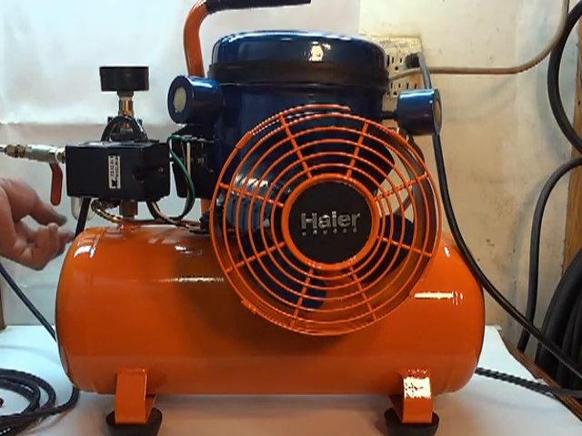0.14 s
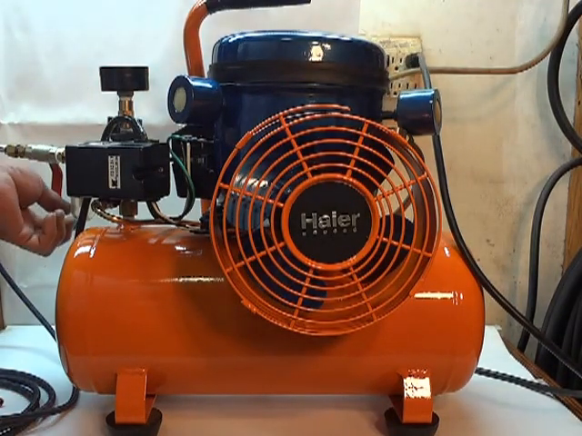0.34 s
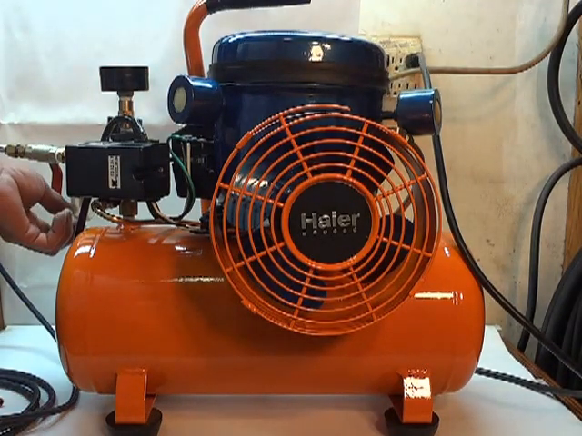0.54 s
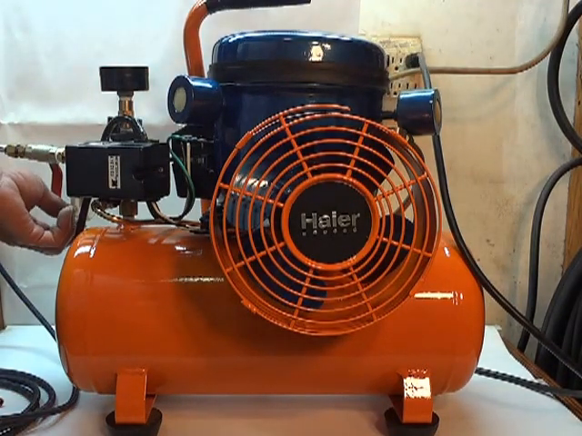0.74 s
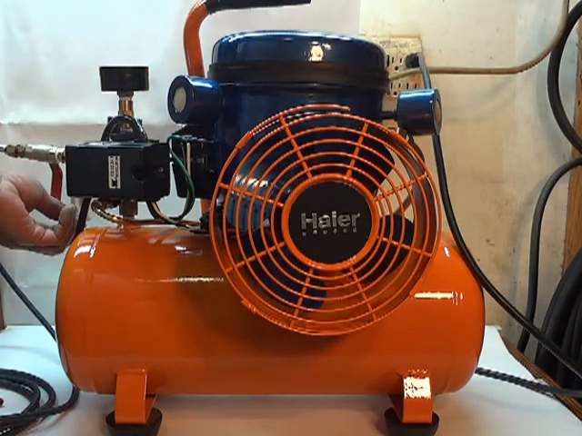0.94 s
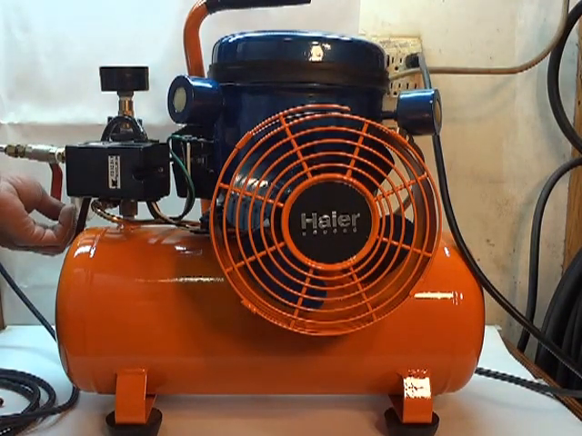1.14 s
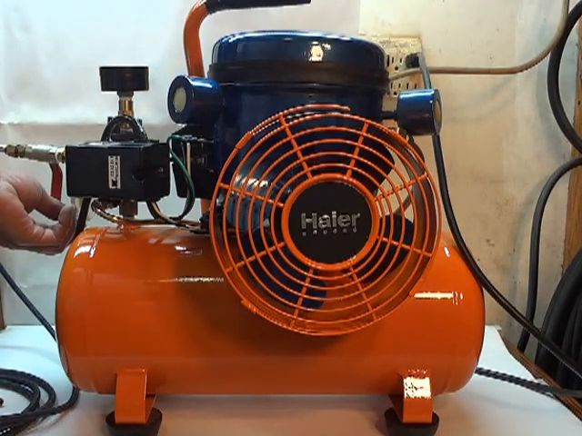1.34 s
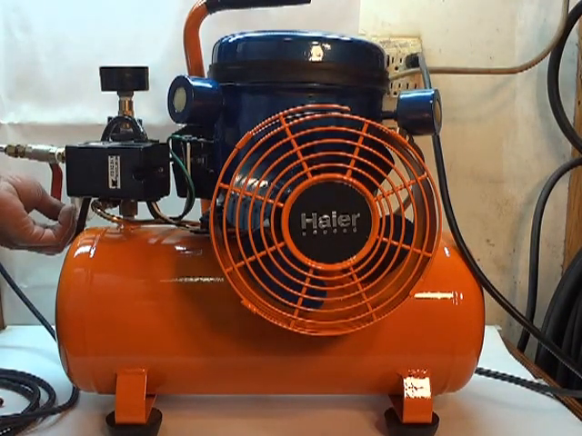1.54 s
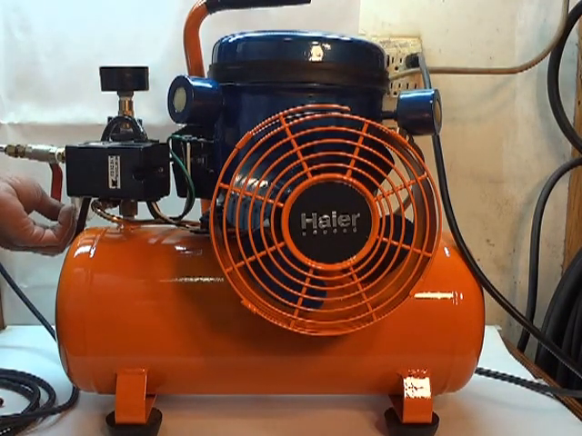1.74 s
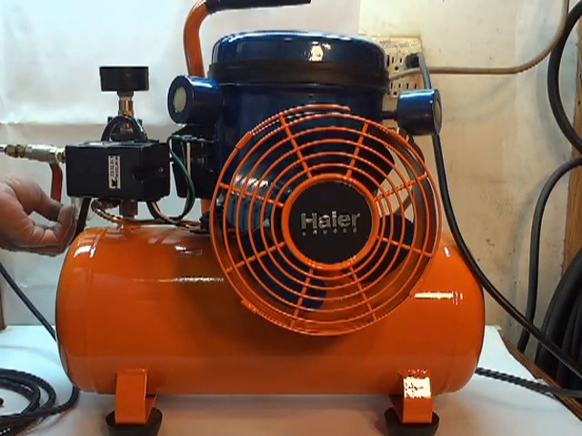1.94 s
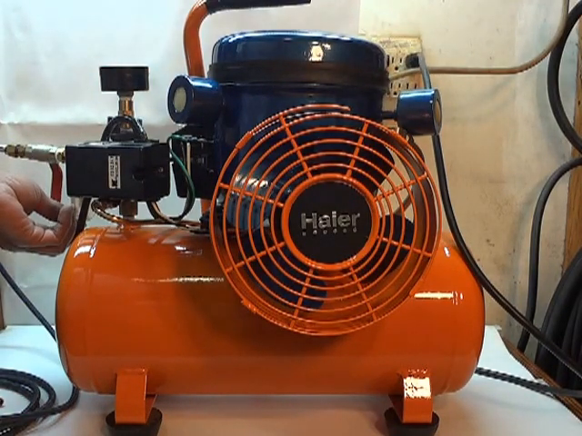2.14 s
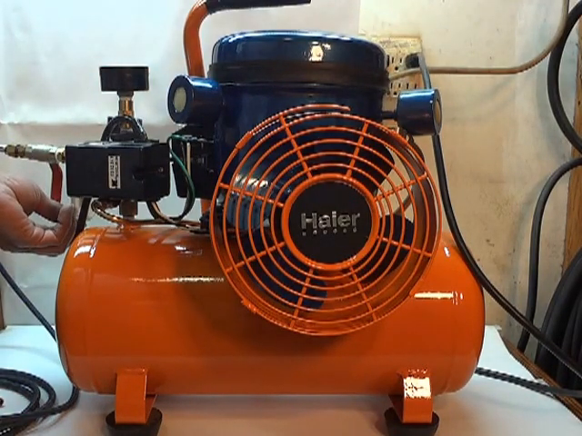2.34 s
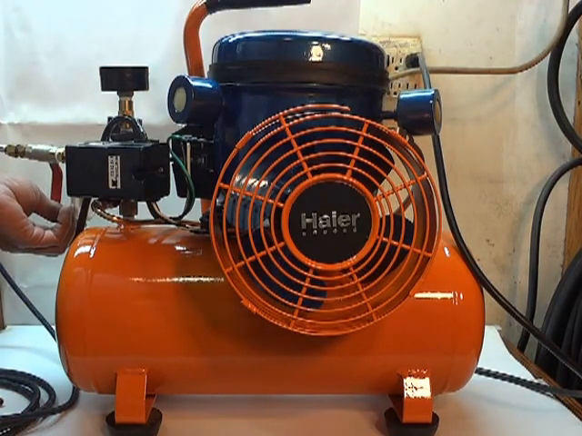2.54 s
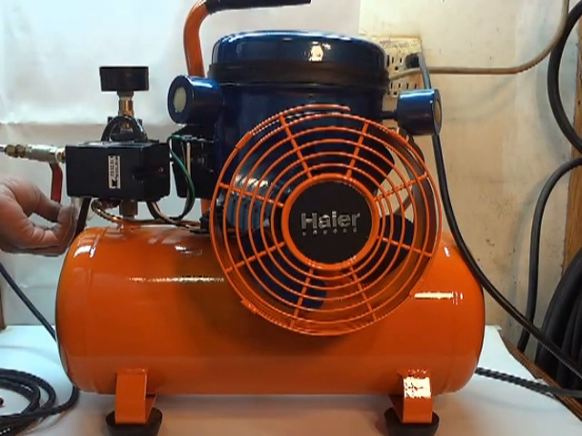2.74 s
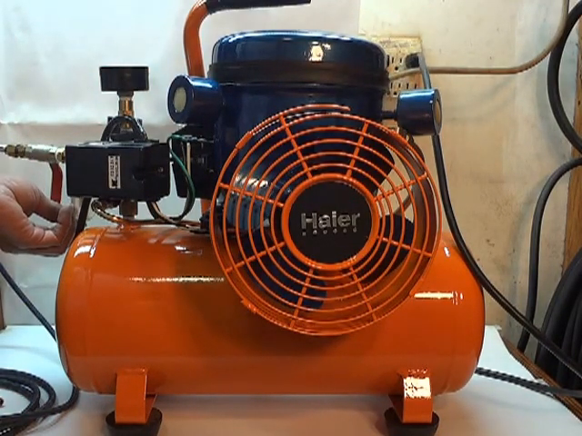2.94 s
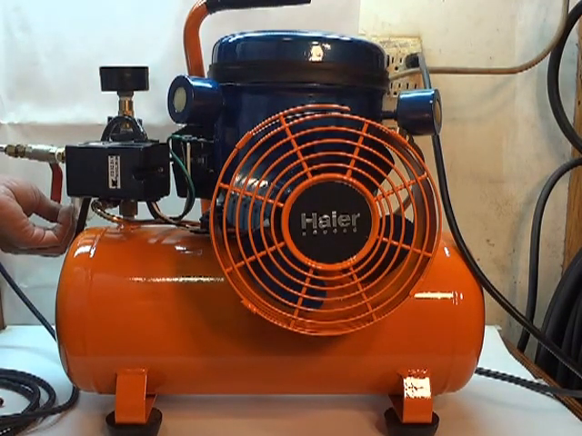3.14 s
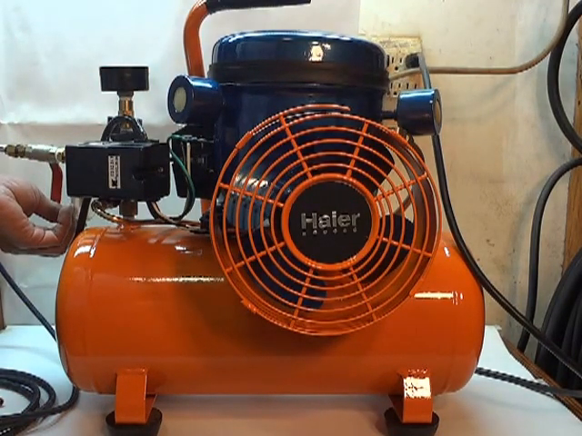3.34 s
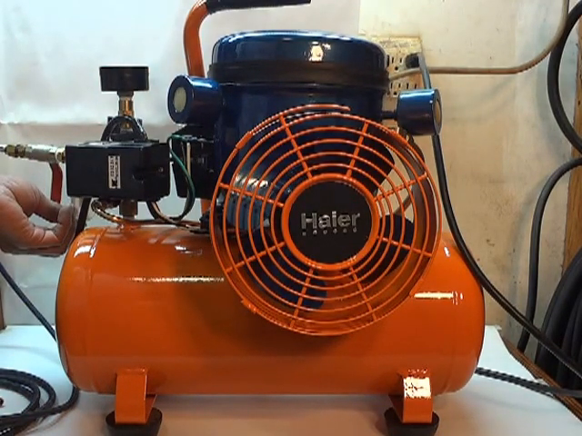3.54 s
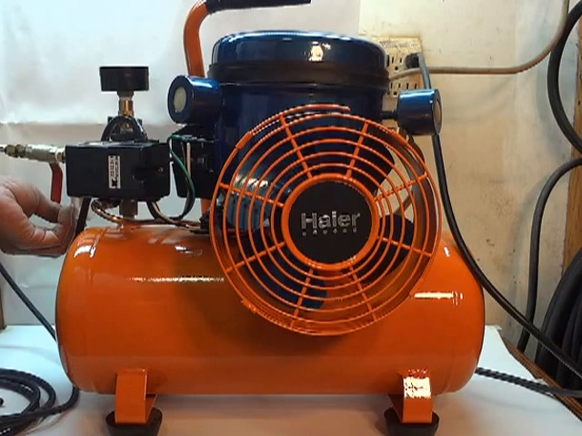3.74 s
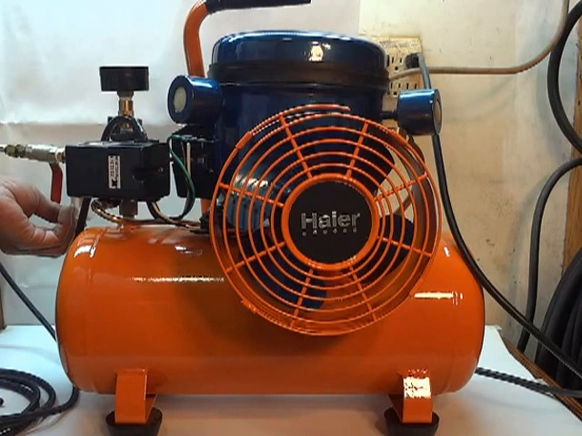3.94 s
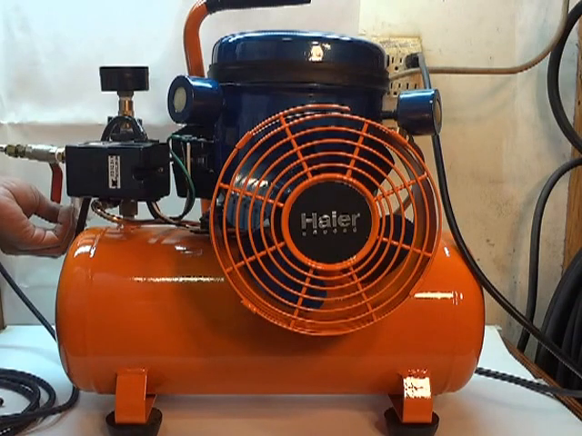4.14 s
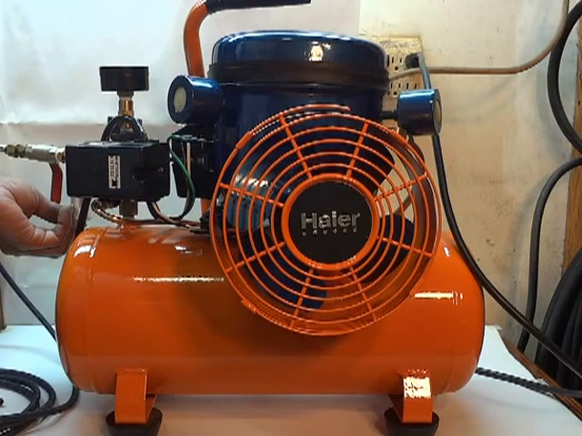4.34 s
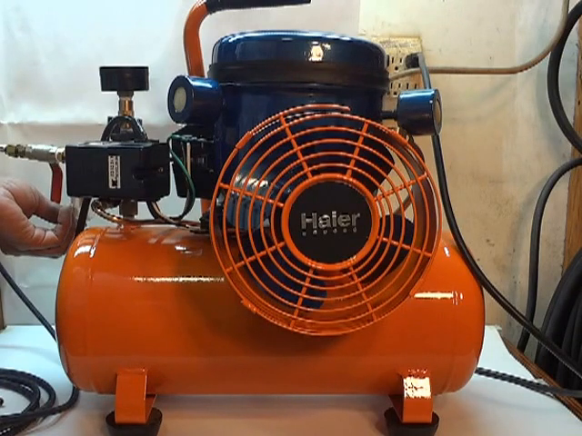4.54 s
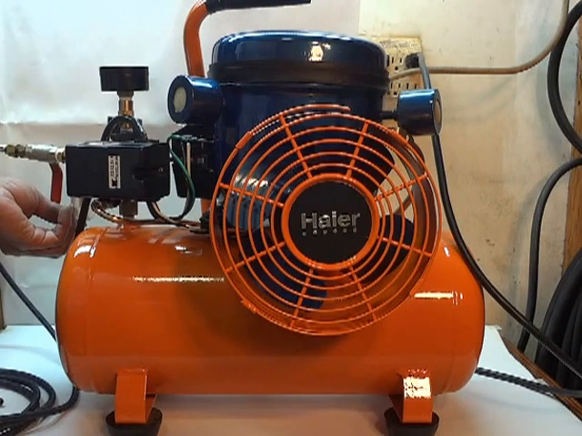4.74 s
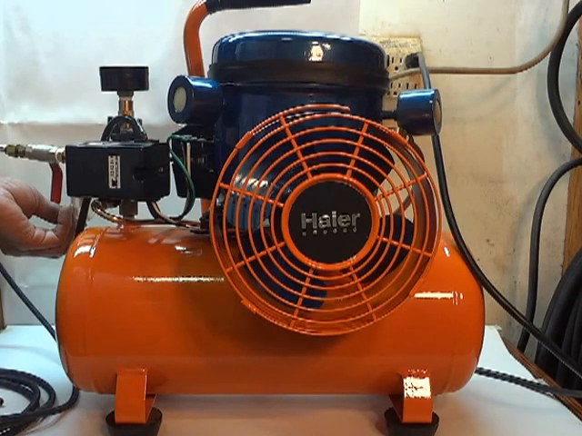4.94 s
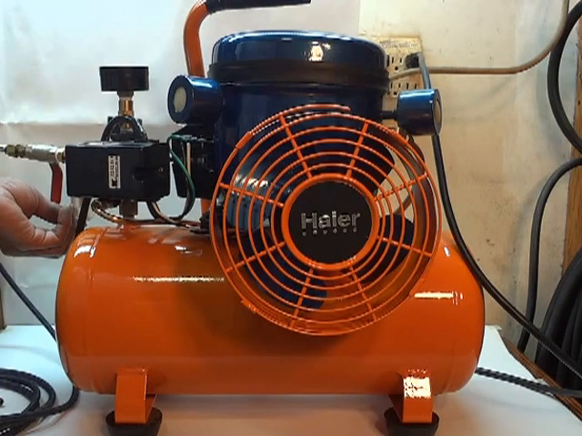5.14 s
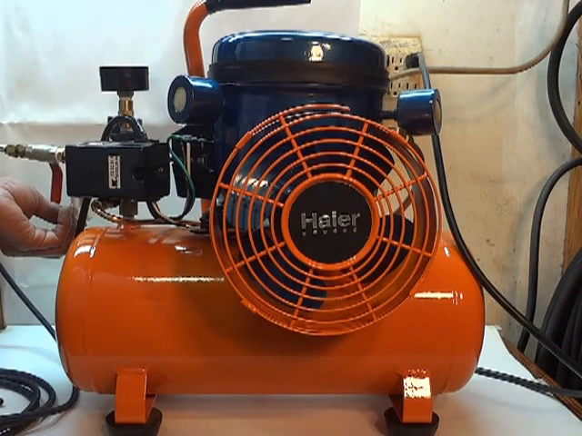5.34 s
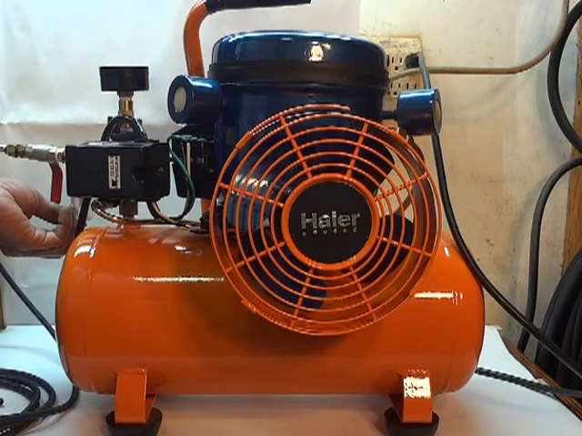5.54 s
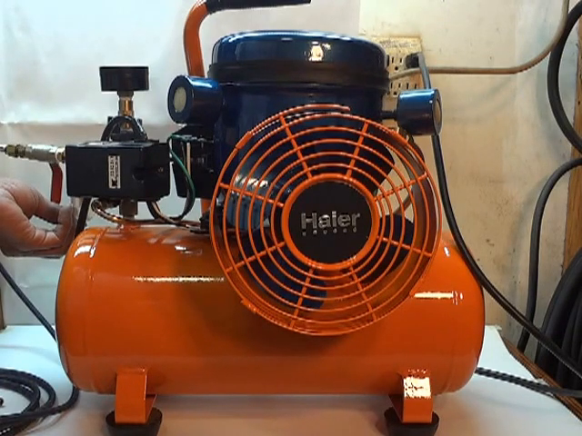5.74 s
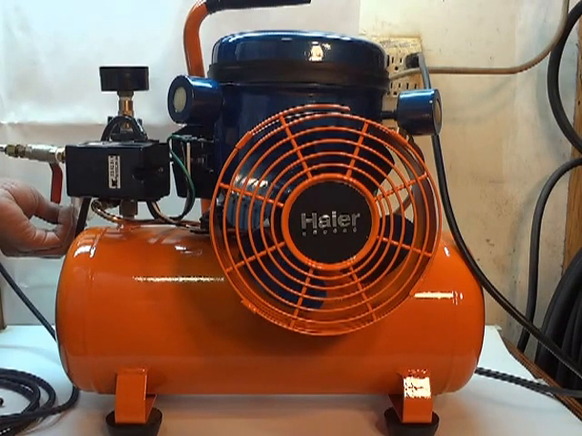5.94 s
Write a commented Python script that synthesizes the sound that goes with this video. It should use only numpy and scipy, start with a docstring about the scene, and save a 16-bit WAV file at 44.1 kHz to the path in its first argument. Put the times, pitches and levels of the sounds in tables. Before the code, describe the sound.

Close stereo pickup of a small air compressor being vented by hand. First a brief soft swish, quiet diffuse room noise and barely audible squeaks; then pressurised air abruptly escapes as a sizzling, slightly metallic hiss with a narrow whistling edge. The whistle fades as the jet grows fuller, and the hiss stays nearly constant, covering the soft hum and rumble, with no cutoff.

```python
"""Venting a compressor tank

A hand opens the vent valve of a small air compressor's tank in a workshop, heard in stereo.
After a swish and faint squeaks the seat seeps; then a jet of filtered noise hisses, rings the fittings
and fills out as the valve opens further, with a narrow-band edge tone and soft low bumps.
Beneath lie coloured noise for the room's rush and rumble, and wavering sines for mains hum and whine."""
import sys
import numpy as np
from scipy import signal
from scipy.fft import rfft, irfft
from scipy.io import wavfile

SR = 44100
rng = np.random.default_rng(int(sys.argv[2]) if len(sys.argv) > 2 else 0)


def transcribe(u):
    """Save the signal u as a 16-bit wav file named by the first command-line argument.

    u: samples, shape (n,) or (channels, n), limited to [-1, 1]; the rate is SR.
    q: integer samples, one column per channel.
    """
    v = np.clip(np.atleast_2d(u).T, -1, 1)
    q = np.round(v * 32767).astype(np.int16)
    wavfile.write(sys.argv[1], SR, q)


N = 264159
TIME, HZ = np.arange(N) / SR, np.fft.rfftfreq(N, 1 / SR)
EDGE_HZ = 11010  # upper edge of the sound's band
# first turn of the valve: the moment the seat lifts, and the time constant of the jet's build-up
OPEN_S, ATTACK_S = 1.066, 0.041

# Spectrum of the low rumble. Each row: frequency in Hz, relative level in dB per Hz.
RUMBLE_COLOUR = [(12, -6.5), (26, -3), (40, -6), (58, -13), (82, -1.5), (105, -7.5), (170, -36), (400, -54)]
# Left-right correlation of the escaping air. Each row: frequency in Hz, correlation from 0 to 1.
JET_LIKENESS = [(1000, 0.24), (2200, 0.61), (4000, 0.79), (5800, 0.88), (11000, 0.92)]
# Left-right correlation of the room's sound. Each row: frequency in Hz, correlation from -1 to 1.
ROOM_LIKENESS = [(60, 1), (125, 0.5), (250, -0.062), (500, -0.36), (1000, -0.39), (3000, 0.39)]


def amp(db):
    """Decibels to amplitude gain, 20 dB per factor of ten."""
    return 10 ** (np.asarray(db) / 20)


def unit(x):
    """Normalisation to a root-mean-square value of 1."""
    return x / np.sqrt(np.mean(x ** 2) + 1e-20)


def since(start_s):
    """Elapsed time in seconds since a moment, zero before it."""
    return np.maximum(TIME - start_s, 0)


def rise(start_s, attack_s):
    """Exponential approach from 0 to 1, quickest at first."""
    return 1 - np.exp(-since(start_s) / attack_s)


def ease(x, scale):
    """Gaussian approach from 0 to 1 with a soft start, as x grows past its scale."""
    return 1 - np.exp(-(x / scale) ** 2)


def swell(centre_s, length_s):
    """Gaussian envelope: a smooth rise and fall around one moment."""
    return np.exp(-((TIME - centre_s) / length_s) ** 2)


def read(points):
    """Interpolation of a frequency table on a logarithmic axis, at every bin."""
    hz, value = np.transpose(points)
    return np.interp(np.log(HZ + 1), np.log(hz + 1), value)


def resonances(modes):
    """Resonance: Lorentzian power peaks stand on a flat base; gives the amplitude gain."""
    power = 1
    for hz, width_hz, db in modes:
        power = power + abs(amp(db) ** 2 - 1) / (1 + (2 * (HZ - hz) / width_hz) ** 2)
    return np.sqrt(power)


def noise(likeness):
    """Partial coherence: a mid and a side noise mix into two white spectra of given correlation."""
    mid, side = rfft(rng.standard_normal((2, N)))
    same = np.clip(read(likeness), -.99, .99)
    shared = mid * np.sqrt(1 + same)
    opposed = side * np.sqrt(1 - same)
    return shared + np.array([[1], [-1]]) * opposed


def coloured(spectrum, likeness, peaks=1):
    """Spectral shaping: white stereo noise takes a given colour, at rms 1."""
    return unit(irfft(noise(likeness) * amp(read(spectrum)) * peaks, N))


def wander(rate_hz):
    """Low-pass noise: random drift of rms 1, mostly slower than the given rate."""
    drift = rfft(rng.standard_normal(N)) * (HZ > 0) / (1 + (HZ / rate_hz) ** 2)
    return unit(irfft(drift, N))


def tone(hz, waver_db=2.5, drift=0.42):
    """Modulation: a sine of rms 1 wavers in level (dB rms) and phase (radians rms)."""
    line = unit(np.sin(2 * np.pi * hz * TIME + drift * wander(rate_hz=3.1)))
    return amp(waver_db * wander(rate_hz=2.7)) * line


def fuzzy_tone(centre_hz, width_hz):
    """Resonant filtering: noise in one narrow band sounds as a fuzzy pitch, at rms 1."""
    band = 1 / (1 + (2 * (HZ - centre_hz) / width_hz) ** 2)
    return unit(irfft(noise(JET_LIKENESS) * band, N))


def swish(db=-53, decay_s=0.074, linger_db=-66, linger_s=0.34):
    """Two-stage exponential decay: a soft, bright swish dies away as the hand reaches in."""
    # Each row: frequency in Hz, relative level in dB per Hz.
    colour = [(100, -10), (900, -1), (3000, -8.0), (7000, -11.0), (11000, -19)]
    fade = amp(db) * np.exp(-TIME / decay_s) + amp(linger_db) * np.exp(-TIME / linger_s)
    return fade * coloured(colour, ROOM_LIKENESS, resonances([(3100, 130, 7.3)]))


def workshop(whine_hz=889.0, whine_db=-74, whine_sink=0.45):
    """Superposition: diffuse rush, hum, rumble and whine sink as the valve widens, then partly return."""
    # Spectrum of the rush. Each row: frequency in Hz, relative level in dB per Hz.
    room_colour = [(50, -34), (110, -7.5), (400, -4), (550, -4), (900, -7.5), (1150, -7.5), (1400, -11),
                   (1650, -12), (2700, -17.5), (4000, -20), (7000, -22.5), (11000, -23)]
    # Broad resonances of the rush. Each row: frequency in Hz, width in Hz, peak gain in dB.
    room_peaks = [(743, 17, 10), (1360, 93, 6), (2530, 120, 6.5), (3230, 170, 5)]
    # Mains hum and a low drone. Each row: frequency in Hz, level in dB relative to the rush.
    hum_lines = [(59.5, -14.5), (119.8, -18), (354.5, -25)]
    rush_db, rumble_db = -57.5, -69
    sink_s, sink_takes_s, return_s = 1.96, 0.35, 0.69
    first_db, lasting_db = -14, -4.5  # depth the sinking starts from, depth that stays
    rumble_sink = 1.3  # the rumble's multiple of the sinking in dB

    depth_db = first_db + (lasting_db - first_db) * rise(sink_s, return_s)
    sink_db = depth_db * ease(since(sink_s), sink_takes_s)
    rush = amp(0.51 * wander(rate_hz=13.0)) * coloured(room_colour, ROOM_LIKENESS, resonances(room_peaks))
    hum = sum(amp(db) * tone(hz) for hz, db in hum_lines)
    rumble_level = amp(rumble_db + rumble_sink * sink_db + 1.5 * wander(rate_hz=6))
    rumble = rumble_level * coloured(RUMBLE_COLOUR, ROOM_LIKENESS)
    whine = amp(whine_db + whine_sink * sink_db) * tone(whine_hz, waver_db=1.0, drift=.25)
    return amp(rush_db + sink_db) * (rush + hum) + rumble + whine


def squeaks(width_hz=200):
    """Narrow-band bursts: the valve squeaks faintly as the fingers take hold."""
    # Each row: centre time in seconds, pitch in Hz, level in dB, length in seconds.
    squeak_events = [(.63, 6750, -80, .07), (.89, 3200, -70, .03)]
    return sum(amp(db) * swell(centre_s, length_s) * fuzzy_tone(hz, width_hz)
               for centre_s, hz, db, length_s in squeak_events)


def seep(attack_s=.04, spit_attack_s=.012):
    """Leakage noise: a thin hiss grows through the barely lifted seat and spits as it lets go."""
    # Each row: frequency in Hz, relative level in dB per Hz.
    seep_colour = [(4000, -40), (6000, -14), (6330, -4), (6570, -13), (6820, -1), (7150, -17), (7550, -16),
                   (8000, -17), (11000, -22)]
    start_s, lift_db, swell_db_per_s = 0.9, -58.5, 80  # the level holds for the seat's lift
    spit_db, spit_s = -47, .04

    before_lift_s = np.maximum(OPEN_S - TIME, 0)
    leak = rise(start_s, attack_s) * amp(lift_db - swell_db_per_s * before_lift_s)
    spit = amp(spit_db) * rise(OPEN_S, spit_attack_s)
    fade = 1 - ease(since(OPEN_S), spit_s)
    return (leak + spit) * fade * coloured(seep_colour, JET_LIKENESS)


def gap():
    """Valve kinematics: a second turn widens the gap from 0 (cracked) towards 1 (wide open)."""
    widen_s, widen_takes_s, widest = 1.72, 0.79, 0.93
    return widest * ease(since(widen_s), widen_takes_s)


def reflections(echo_db, decay_s, count=60):
    """Interference: echoes off the tank, bench and wall comb the spectrum with fine ripples."""
    delay_s = rng.uniform(.006, .045, count)
    taps = np.zeros(N)
    taps[(delay_s * SR).astype(int)] = rng.choice([-1, 1], count) * np.exp(-delay_s / decay_s)
    return 1 + amp(echo_db) * rfft(taps) / np.linalg.norm(taps)


def jet(flutter_db=0.56, surge_db=0.41, sizzle_hz=9100, shimmer_db=.46):
    """Jet turbulence rings the outlet; a wider gap sheds larger eddies and adds body."""
    # Spectrum with the valve wide open. Each row: frequency in Hz, relative level in dB per Hz.
    wide_colour = [(200, -35.5), (750, -29), (1200, -24.5), (1650, -27.5), (1950, -15), (2750, -14.5),
                   (3100, -12), (4050, -14.5), (5200, -6.5), (6050, -7.5), (7200, -2.5), (8000, 0.16),
                   (9000, -1.5), (11000, -0.5)]
    # Change of colour in the barely cracked valve. Each row: frequency in Hz, gain in dB.
    cracked_change = [(1000, -2.5), (2300, -5), (3200, -3.5), (5150, -4.5), (5500, -1), (6300, 1),
                      (6850, 2.5), (7230, -1), (8400, -1.5), (9300, 1.5), (11000, -0.5)]
    # Resonances of the valve's outlet and the gaps around it.
    # Each row: frequency in Hz, width in Hz, peak gain over the jet in dB.
    outlet_modes = [(1413, 37, 5.8), (2955, 55, 6.7), (3481, 136, 5.8), (3850, 111, 7.6), (4419, 300, 9.3),
                    (5501, 56, 9.6), (5762, 157, 12.0), (6195, 49, 9.5), (6338, 58, 12.0), (6519, 35, 6.1),
                    (6794, 32, 9.0), (6875, 54, 7.4), (7598, 180, 5.9), (7796, 24, 2.5), (7890, 46, 7.4),
                    (8082, 25, 7.5), (8589, 24, 4.2), (8790, 24, 4.2), (9202, 37, 5.0), (9388, 58, 12.0),
                    (9616, 24, 5.7), (9874, 24, 12.0), (9917, 24, 10.3), (10045, 108, 7.8),
                    (10177, 24, 3.2), (10426, 52, 10.3), (10485, 24, 8.5), (10778, 71, 9.3),
                    (10839, 25, 9.7), (10972, 24, 6.4)]
    start_db, creep_db_per_s = -25.5, 0.2849  # level as the seat lifts, and its slow growth
    # the finest sizzle: weak when cracked, strongest past a small gap, easing as the valve widens
    sizzle_attack_s, sizzle_cracked_db, sizzle_gain_db = 0.023, -3, 4.5
    sizzle_gap, sizzle_ease_db = 0.037, -1.04

    opening = gap()
    sizzle_db = sizzle_cracked_db + sizzle_gain_db * np.tanh(opening / sizzle_gap) + sizzle_ease_db * opening
    sizzle = rise(OPEN_S, sizzle_attack_s) * amp(sizzle_db + shimmer_db * wander(rate_hz=8.6))

    air = noise(JET_LIKENESS) * amp(read(wide_colour)) * resonances(outlet_modes)
    air *= reflections(echo_db=-10.5, decay_s=0.016)
    air *= HZ < EDGE_HZ * 1.02
    air /= irfft(air, N).std()
    fine = 1 / (1 + np.exp((sizzle_hz - HZ) / 150))  # smooth crossover into the sizzle band
    hiss = 0
    for band, gain in ((air * (1 - fine), 1), (air * fine, sizzle)):
        wide = irfft(band, N)
        cracked = irfft(band * amp(read(cracked_change)), N)
        hiss = hiss + gain * (opening * wide + (1 - opening) * cracked)

    # the jet flaps quickly and surges slowly
    unsteady_db = flutter_db * wander(rate_hz=75) + surge_db * wander(rate_hz=14)
    level_db = start_db + creep_db_per_s * since(OPEN_S)
    return hiss * rise(OPEN_S, ATTACK_S) * amp(level_db + unsteady_db)


def whistle(centre_hz=7570, width_hz=190):
    """Edge tone: the narrow gap sings louder as it starts to widen, then falls silent."""
    cracked_db, sing_db = -41, 7  # level in the cracked valve, extra level once it widens
    sing_gap, silent_gap = .03, 0.36  # gap scales of the growth and of the silencing
    opening = gap()
    level = amp(cracked_db + sing_db * np.tanh(opening / sing_gap)) * (1 - ease(opening, silent_gap))
    return rise(OPEN_S, ATTACK_S) * level * fuzzy_tone(centre_hz, width_hz)


def bumps():
    """Amplitude envelopes: low rumble swells briefly while the hand works the valve."""
    # Each row: centre time in seconds, level in dB, length in seconds.
    bump_events = [(1.714, -61, 0.068), (1.9, -59, .04)]
    envelope = sum(amp(db) * swell(centre_s, length_s) for centre_s, db, length_s in bump_events)
    return envelope * coloured(RUMBLE_COLOUR, ROOM_LIKENESS)


def scene():
    """Linear superposition of the venting valve and the workshop."""
    return swish() + workshop() + squeaks() + seep() + jet() + whistle() + bumps()


def record(dry):
    """Band limitation: a steep linear-phase low-pass filter removes the top treble."""
    lowpass = signal.firwin(1023, EDGE_HZ, window=("kaiser", 9), fs=SR)
    return signal.oaconvolve(dry, lowpass[None], "same")


dry = scene()
out = record(dry)
transcribe(out)
```